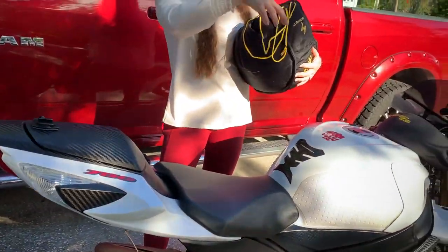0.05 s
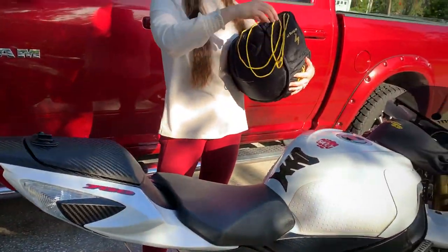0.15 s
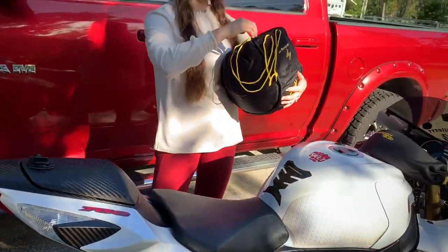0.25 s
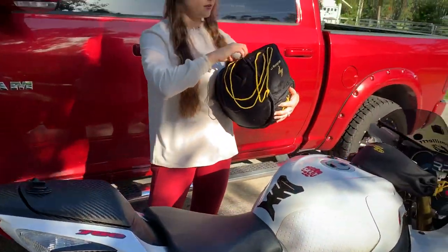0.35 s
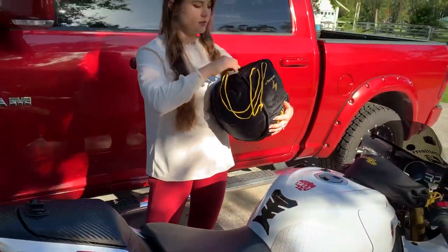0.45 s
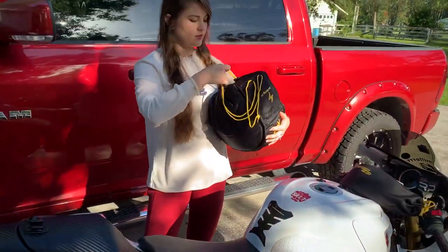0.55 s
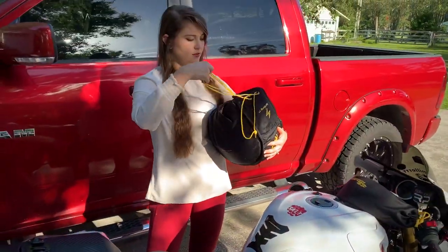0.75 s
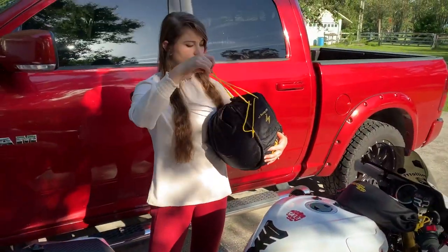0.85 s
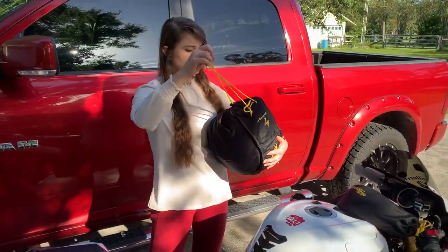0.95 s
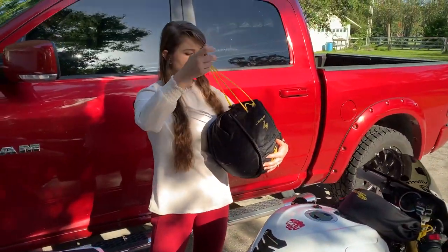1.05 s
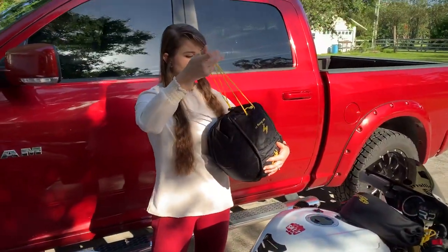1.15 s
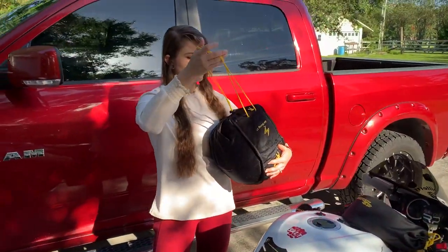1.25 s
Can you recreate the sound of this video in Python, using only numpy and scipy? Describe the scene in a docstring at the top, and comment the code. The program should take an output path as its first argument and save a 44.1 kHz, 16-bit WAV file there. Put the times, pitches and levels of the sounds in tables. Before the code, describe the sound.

A hard hollow shell in a cloth bag clatters once, close up. Until 0.2 s there is only quiet outdoor air with very faint brushes. Light knocks and rustle build from 0.2 s to a loud, clipped cluster of hollow thumps and dry cracks at 0.24-0.27 s, fading with small ticks by 0.45 s. Soft leaf hiss, low rumble and faint treble insect buzz remain, the buzz quickening after 0.85 s until 1.3 s.

```python
"""Outdoors on a quiet summer day, a cloth bag with a hard hollow shell inside is handled close by. The cloth
rustles as creases snap and folds ring; a quick clatter drives the shell's modes, with noise cracks from cord
and toggle, and its loudest peaks clip. Short swells of narrow noise give lone brushes, and two bright ones near
3.3 kHz sharpen knocks on the shell. An insect buzzes in the treble: noise bursts in wing resonances. Shaped
noise gives leaf hiss, a drone of far road and leaves, and low rumble."""
import sys
import numpy as np
from scipy import signal
from scipy.fft import rfft, irfft, next_fast_len
from scipy.io import wavfile

SR = 44100
rng = np.random.default_rng(int(sys.argv[2]) if len(sys.argv) > 2 else 0)


def amplitude_ratio(level_db):
    """Convert a level in decibels to the matching linear amplitude (field) ratio."""
    exponent = np.asarray(level_db, float) / 20
    return 10 ** exponent


def file_out(sig):
    """Save sig as 16-bit WAV at sys.argv[1]."""
    # one column per channel
    cols = np.atleast_2d(sig).T
    # limit, then scale
    lim = np.clip(cols, -1, 1)
    pcm = np.round(lim * 32767).astype(np.int16)
    wavfile.write(sys.argv[1], SR, pcm)


N = 57330

# Air spectrum. Each row: frequency in Hz, relative density in dB per Hz.
AIR_SPECTRUM = [(18, -50), (30, -22), (58, -1), (81, 1), (114, -5.5), (150, -15.5), (230, -18), (330, -23),
                (480, -29), (650, -37.5), (950, -33), (1500, -41), (2430, -36.5), (2750, -39.5),
                (4500, -36), (5550, -39.5), (7200, -34.5), (8500, -45.5), (10100, -42), (12300, -54),
                (13300, -56), (15200, -46.5), (16100, -84.5)]
# Left-right likeness of the air. Each row: frequency in Hz, likeness from 0 to 1.
AIR_ALIKE = [(30, 0.82), (60, 0.84), (130, 1), (290, 0.28), (640, .2), (1400, 0.046), (15000, 0.046)]
# Low rumble level, uneven as random noise is. Each row: time in seconds, relative level in dB.
RUMBLE_LEVEL = [(0, -39.5), (.328, -35.5), (.76, -37), (.818, -46), (.89, -37), (.988, -37.5),
                (1.166, -52.5), (1.194, -37.5), (1.3, -36)]
# Air between rumble and hiss. Each row: time in seconds, gain in dB.
MIDDLE_GAIN = [(0, 16), (.06, -2), (.14, 1.5), (.19, -1.5), (.42, 10), (.5, 2), (.85, -3), (.97, 3.5),
               (1.1, -1.5), (1.3, -3)]
# Leaf hiss. Each row: time in seconds, gain in dB.
HISS_GAIN = [(0, 0.5), (.7, 0.5), (1.0, 3.5), (1.3, 2.5)]
AIR_DB, AIR_LEAD_S, RUMBLE_TOP_HZ, HISS_FROM_HZ = -40.5, 0.0004, 151, 1700

# Short swells of narrow noise: lone brushes, and at .2575 s and .323 s bright 3.3-3.4 kHz rings that sharpen
# the shell's knocks. Each row: start in seconds, crest level in dB, centre in Hz, width in Hz, length in
# seconds.
BRUSHES = [(0, -53, 1500, 1300, .09), (.095, -45, 1780, 500, .02), (.097, -53, 3100, 800, .027),
           (.109, -55, 4600, 900, .016), (.2575, -17, 3400, 450, .0055), (.323, -31, 3300, 260, .008),
           (.560, -54, 1070, 110, .03)]

# Cloth rubbing and crumpling. Each row: time in seconds, relative level in dB.
RUSTLE = [(0.0, -53), (0.072, -65), (0.112, -52.5), (0.138, -71), (0.195, -80), (0.2, -37), (0.218, -37),
          (0.232, -36), (0.238, -30.5), (0.252, -19.5), (0.314, -41), (0.328, -33), (0.35, -60.5),
          (0.356, -46.5), (0.41, -48.5), (0.46, -80.5)]
# Cloth spectrum. Each row: frequency in Hz, relative density in dB per Hz.
CLOTH_SPECTRUM = [(400, -12.5), (800, -9), (1500, -5.5), (2400, -10.5), (3350, -9), (4900, -7),
                  (11800, -17.5), (13200, -33), (15300, -25), (16100, -52)]
# Left-right likeness of cloth and cracks. Each row: frequency in Hz, likeness from 0 to 1.
BAG_ALIKE = [(100, 0.92), (600, 1), (1500, 0.54), (4000, 0.38), (10000, 0.58)]
RUSTLE_DB, CREASES_PER_S, CREASE_SPREAD_DB = 3, 2500, 3
FOLD_LOW_HZ, FOLD_HIGH_HZ, FOLD_T60_CYCLES, FOLD_DB = 500, 4680, 14, -10.5

# Insect beat, about 26 strokes per second, then about 39 from 0.845 s on.
# Each row: time in seconds, wing strokes made so far.
STROKES = [(-0.0038, 0), (0.5043, 13), (0.8076, 21), (0.8435, 22), (0.8699, 23), (1.3067, 40)]
# Insect loudness. Each row: time in seconds, level in dB.
INSECT_LEVEL = [(0, -60), (0.45, -62.5), (0.85, -61.5), (1.0, -57.5), (1.3, -56)]
# Wing resonances. Each row: centre in Hz, width in Hz, relative level in dB.
WING = [(9660, 1500, 3.5), (10820, 2100, -9)]
BURSTS_PER_STROKE, BURST_GAP_S, BURST_LOSS_DB, BURST_T60_S = 3, 0.0052, 2.0, 0.035
INSECT_LAG_S, INSECT_WIDE_DB = 0.00018, -19

# Knocks on the shell. Each row: start in seconds, relative strength in dB, contact time in ms.
KNOCKS = [(0.1978, -26.5, 0.24), (0.2049, -19.5, 1.1), (0.2072, -12, 1.5), (0.2132, -26.5, 0.68),
          (.2190, -22, 1.04), (0.2284, -19, 0.7), (.2306, -10, 1.8), (0.2408, 5.5, 0.8), (.2440, 4, 1.4),
          (0.2515, 0.5, 0.15), (0.2607, 4, 0.6), (.2650, -2.5, 0.45), (0.276, -9.5, 0.22),
          (.2855, -11, 1.8), (0.2967, -13.5, 3.1), (.3100, -10.5, 2.44), (0.3261, -24.5, 0.09),
          (0.3565, -27, 0.093)]
# Shell modes. Each row: frequency in Hz, relative level in dB, t60 in seconds.
SHELL_MODES = [(110, -12.5, 0.033), (164, -7, 0.061), (203, -6.5, 0.069), (237, 0, 0.2), (361.4, -2, 0.064),
               (429, -12, 0.071), (515.4, -7, 0.031), (630.2, -5, 0.038), (799, -12, 0.02),
               (901, -7, 0.029), (1047.6, -7.5, 0.041), (1258, -4.5, 0.02), (1587, -6.5, 0.014),
               (2270, -12, 0.018), (3290, -7.5, 0.029)]
# Low modes, weak in the lead-in, cut short at the end. Each row: time in seconds, gain in dB.
LOW_MODES_GAIN = [(.2, -8), (.225, -7.5), (.24, 1), (.272, 0), (.29, -4), (.315, -0.5), (.34, 2),
                  (.37, -5.5)]
# Dry cracks of cord and toggle on the shell. Each row: start in seconds, relative level in dB, t60 in seconds.
CRACKS = [(0.1975, -21.5, 0.016), (0.2265, -23.5, 0.042), (0.2389, -9.5, 0.023), (0.249, -13, 0.022),
          (0.2596, -13.5, 0.024), (0.2644, -16, 0.029), (0.2778, -21.5, .035), (0.3324, -22, 0.021),
          (0.336, -24.5, .035), (0.3566, -20, 0.022), (0.373, -26.5, 0.054), (0.397, -36, 0.046)]
# Crack spectrum. Each row: frequency in Hz, relative density in dB per Hz.
CRACK_SPECTRUM = [(880, -30), (1500, 2.5), (2430, -10), (3400, -2), (5000, -11.5), (6500, -10.5),
                  (10300, -11), (13200, -23.5), (15400, -13.5), (16100, -40.5)]
BODY_DB, STRIKE_SPREAD_DB, SIDE_SPREAD_DB = -4.5, 5.5, 2
BODY_CUT_HZ, LOW_MODES_BELOW_HZ = 162.5, 300
CRACK_DB, CRACK_GRAIN_DB = -5.5, 3.5

# Echoes off the vehicles and ground. Each row: delay in seconds, level in dB.
ECHOES = [(.011, -14.5), (.023, -17.5), (.047, -23.5)]
# Two ports hearing the bag. Each row: frequency in Hz, left port's lead in radians.
PORT_LEAD = [(0, 0), (1380, 1.6), (2330, 3.7), (4650, 10.4), (6460, 5.4), (9300, 2.3), (11500, -.6),
             (13800, -3.6), (16400, -6.5)]
CLIP_PEAK = 1.0

LEFT_RIGHT = np.array([[1], [-1]])


def rms_one(x):
    """Scale to rms 1."""
    return x / np.sqrt(np.mean(x ** 2) + 1e-20)


def in_time(rows):
    """Read a (seconds, value) table at every sample."""
    return np.interp(np.arange(N) / SR, *np.transpose(rows))


def at_hz(rows, hz):
    """Read a (Hz, value) table on a log axis."""
    table_hz, values = np.transpose(rows)
    return np.interp(np.log(hz + 1), np.log(table_hz), values)


def colour(x, gain):
    """Filter by a gain given as a function of Hz."""
    size = next_fast_len(N + 2048)
    hz = np.fft.rfftfreq(size, 1 / SR)
    return irfft(rfft(x, size) * gain(hz), size)[..., :N]


def clicks(times_s, heights):
    """Impulses at given times."""
    out = np.zeros(N) + 1e-18
    keep = (times_s >= 0) & (times_s * SR < N - 1)
    np.add.at(out, (times_s[keep] * SR).astype(int), heights[keep])
    return out


def ring(x, hz, t60_s):
    """Two-pole resonator: a unit click sets off a decaying sine of starting height 1."""
    r = amplitude_ratio(-60 / (t60_s * SR))
    w = 2 * np.pi * hz / SR
    return signal.lfilter([0, np.sin(w)], [1, -2 * r * np.cos(w), r * r], x)


def dying(x, t60_s):
    """Turn each click into an exponentially decaying envelope."""
    return signal.lfilter([1], [1, -amplitude_ratio(-60 / (t60_s * SR))], x)


def pair(alike, spectrum, mid, side):
    """Coloured left and right at rms 1, from a shared part and an opposed part."""
    def likeness(hz):
        return np.clip(at_hz(alike, hz), 0, 1)

    def density(hz):
        return amplitude_ratio(at_hz(spectrum, hz))

    shared = colour(mid, lambda hz: density(hz) * np.sqrt(1 + likeness(hz)))
    opposed = colour(side, lambda hz: density(hz) * np.sqrt(1 - likeness(hz)))
    return rms_one(shared + opposed * LEFT_RIGHT)


def lagged(x, lag_s):
    """Delay left against right by lag_s, half on each channel."""
    return colour(x, lambda hz: np.exp(-1j * np.pi * hz * lag_s * LEFT_RIGHT))


def air():
    """Shaped noise split in three bands: leaf hiss, drone of far road and leaves, rumble; each varies in level."""
    noise = lagged(pair(AIR_ALIKE, AIR_SPECTRUM, *rng.standard_normal((2, N))), -AIR_LEAD_S)
    rumble = colour(noise, lambda hz: 1 / (1 + (hz / RUMBLE_TOP_HZ) ** 4))
    middle = colour(noise - rumble, lambda hz: 1 / (1 + (hz / HISS_FROM_HZ) ** 4))
    hiss = noise - rumble - middle
    rumble_db = in_time(RUMBLE_LEVEL)
    rumble = rumble * amplitude_ratio(rumble_db - np.median(rumble_db))
    return amplitude_ratio(AIR_DB) * (hiss * amplitude_ratio(in_time(HISS_GAIN)) + middle * amplitude_ratio(in_time(MIDDLE_GAIN)) + rumble)


def brushes():
    """Half-sine swells of narrow noise, straight ahead."""
    t, white = np.arange(N) / SR, rng.standard_normal(N)
    out = np.zeros(N)
    for start_s, level_db, centre_hz, width_hz, length_s in BRUSHES:
        narrow = rms_one(colour(white, lambda hz: 1 / (1 + (2 * (hz - centre_hz) / width_hz) ** 2)))
        envelope = np.sin(np.pi * np.clip((t - start_s) / length_s, 0, 1))
        out += amplitude_ratio(level_db) * envelope * narrow
    return out


def cloth():
    """Random crease snaps follow the rubbing; each rings briefly in a fold of random pitch."""
    sizes = amplitude_ratio(CREASE_SPREAD_DB * np.minimum(rng.exponential(1, (2, N)), 5))
    signs = rng.choice([-1, 1], (2, N))
    snaps = sizes * signs * (rng.random((2, N)) < CREASES_PER_S / SR)
    folds_hz = np.geomspace(FOLD_LOW_HZ, FOLD_HIGH_HZ, 16)
    fold_of = rng.integers(0, len(folds_hz), N)
    ringing = np.zeros((2, N))
    for k, hz in enumerate(folds_hz):
        own_snaps = snaps * (fold_of == k) + 1e-18
        ringing += ring(own_snaps, hz, FOLD_T60_CYCLES / hz) * np.sqrt(hz / FOLD_HIGH_HZ)
    creases = snaps + amplitude_ratio(FOLD_DB) * ringing
    return amplitude_ratio(in_time(RUSTLE) + RUSTLE_DB) * pair(BAG_ALIKE, CLOTH_SPECTRUM, *creases)


def insect():
    """Each wing stroke gives three fading noise bursts, filtered by the wing resonances."""
    times_s, count = np.transpose(STROKES)
    starts_s = np.interp(np.arange(count[-1]), count, times_s)
    nth = np.arange(BURSTS_PER_STROKE)
    jitter_db = rng.normal(0, 1.484, (len(starts_s), len(nth)))
    heights = amplitude_ratio(-BURST_LOSS_DB * nth + jitter_db)
    bursts_s = starts_s[:, None] + BURST_GAP_S * nth
    gate = dying(clicks(bursts_s.ravel(), heights.ravel()), BURST_T60_S)
    mid, side = rng.standard_normal((2, N)) * gate

    def wing(hz):
        return sum(amplitude_ratio(db) / (1 + (2 * (hz - centre_hz) / width_hz) ** 2) for centre_hz, width_hz, db in WING)

    song = colour(mid + amplitude_ratio(INSECT_WIDE_DB) * side * LEFT_RIGHT, wing)
    return amplitude_ratio(in_time(INSECT_LEVEL)) * lagged(rms_one(song), INSECT_LAG_S)


def shell_cracks():
    """Dry cracks: grainy noise bursts with sudden onset and exponential decay."""
    t, gate = np.arange(N) / SR, np.zeros(N)
    for start_s, level_db, t60_s in CRACKS:
        decay_db = 60 * np.clip(t - start_s, 0, 1) / t60_s
        gate += amplitude_ratio(level_db + CRACK_DB - decay_db) * (t >= start_s)
    noise = rng.standard_normal((2, N))
    grain = amplitude_ratio(CRACK_GRAIN_DB * rng.standard_normal(N))
    return pair(BAG_ALIKE, CRACK_SPECTRUM, *noise * grain) * gate


def shell_knocks():
    """Every knock pushes all modes for its contact time, so longer contact excites less treble."""
    spread = rng.normal(0, 1, (len(KNOCKS), len(SHELL_MODES), 2))
    t, body = np.arange(N) / SR, np.zeros((2, N))
    pushes = []
    for start_s, strength_db, contact_ms in KNOCKS:
        push = np.sin(np.pi * np.clip((t - start_s) / (contact_ms / 1000), 0, 1)) ** 2
        pushes.append(push * amplitude_ratio(strength_db) / (contact_ms / 2000 * SR))  # area set by strength alone
    pushes = np.array(pushes)
    for k, (hz, level_db, t60_s) in enumerate(SHELL_MODES):
        strike_db = STRIKE_SPREAD_DB * spread[:, k, 0] + SIDE_SPREAD_DB * spread[:, k, 1] * LEFT_RIGHT
        drive = amplitude_ratio(level_db + BODY_DB + strike_db) @ pushes + 1e-18
        body += ring(drive, hz, t60_s) * amplitude_ratio(in_time(LOW_MODES_GAIN) * (hz < LOW_MODES_BELOW_HZ))
    return signal.sosfilt(signal.butter(2, BODY_CUT_HZ, "high", fs=SR, output="sos"), -body)


def echoes(bag):
    """Delayed weaker copies off the vehicles and ground, left and right swapped."""
    delays_s, levels_db = np.transpose(ECHOES)
    taps = clicks(delays_s, amplitude_ratio(levels_db))[:SR // 5]
    return signal.fftconvolve(bag[::-1], taps[None], axes=1)[:, :N]


def through_ports(bag):
    """Phase lead of the left port over the right, half on each channel."""
    return colour(bag, lambda hz: np.exp(0.5j * np.interp(hz, *np.transpose(PORT_LEAD)) * LEFT_RIGHT))


def scene():
    """Bag and its echoes through two ports, over brushes, insect and air."""
    bag = shell_knocks() + shell_cracks() + cloth()
    bag = bag + echoes(bag)
    return through_ports(bag) + brushes() + insect() + air()


def top_cut(x):
    """Nothing passes above the cut-off."""
    return signal.sosfilt(signal.butter(12, 16790, fs=SR, output="sos"), x)


def record(dry):
    """Overloaded microphones: loud peaks are clipped flat."""
    clipped = np.clip(dry, -CLIP_PEAK, CLIP_PEAK)
    return top_cut(clipped)


dry = scene()
out = record(dry)
file_out(out)
```